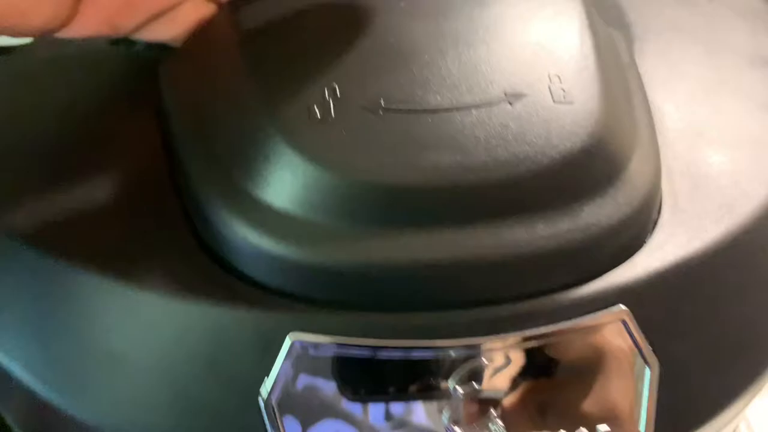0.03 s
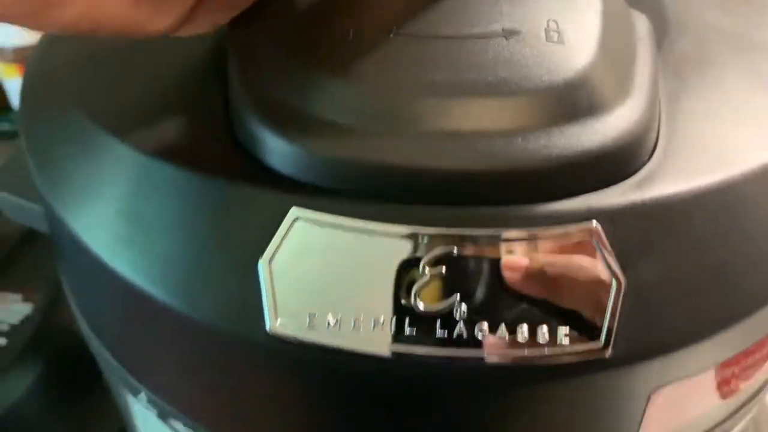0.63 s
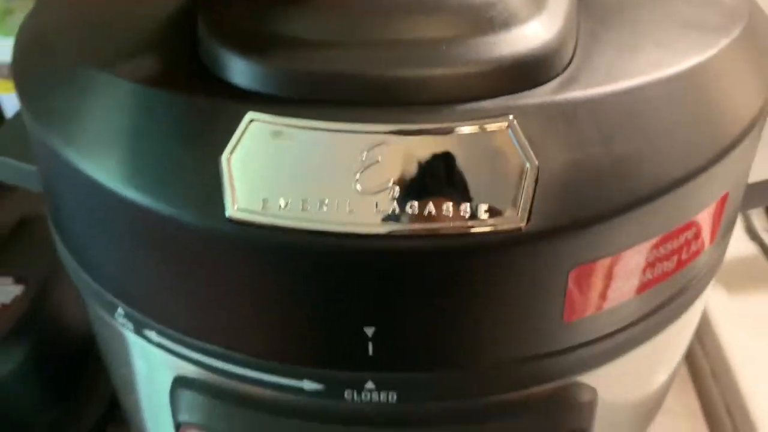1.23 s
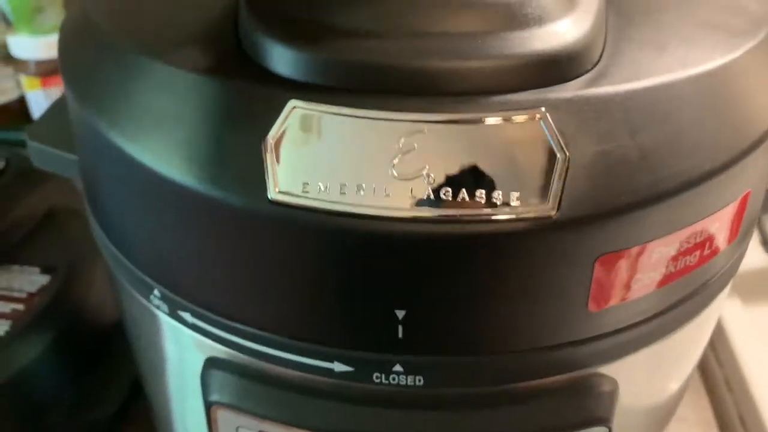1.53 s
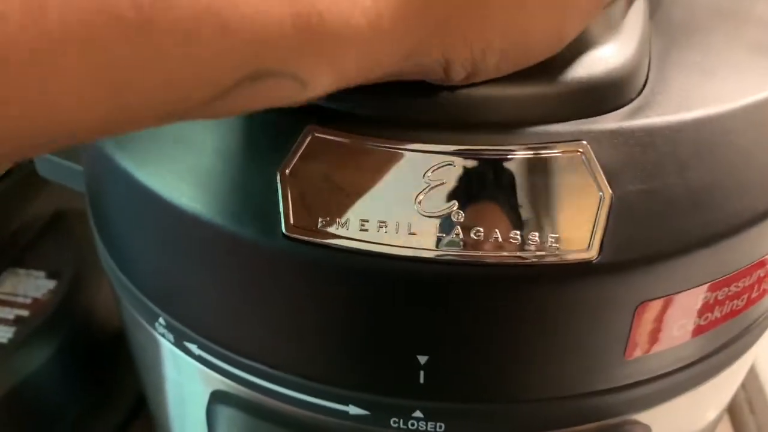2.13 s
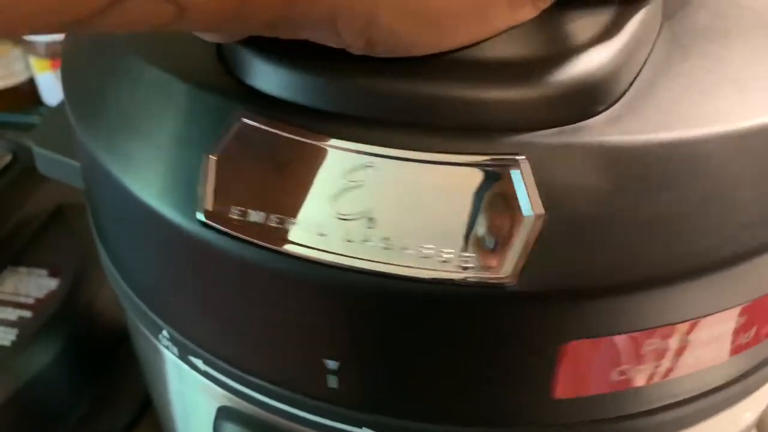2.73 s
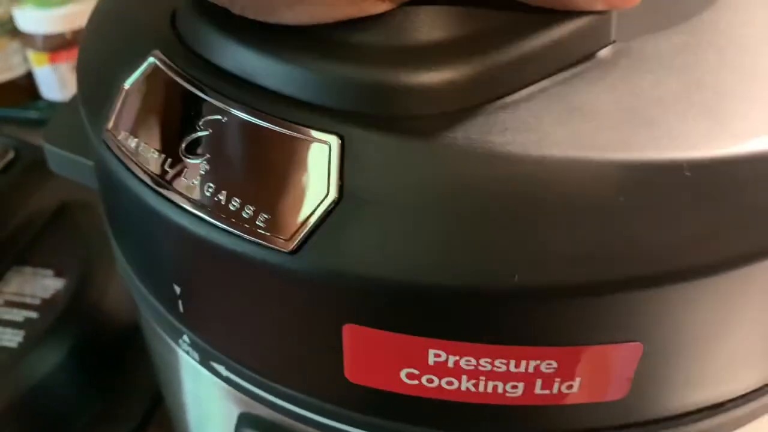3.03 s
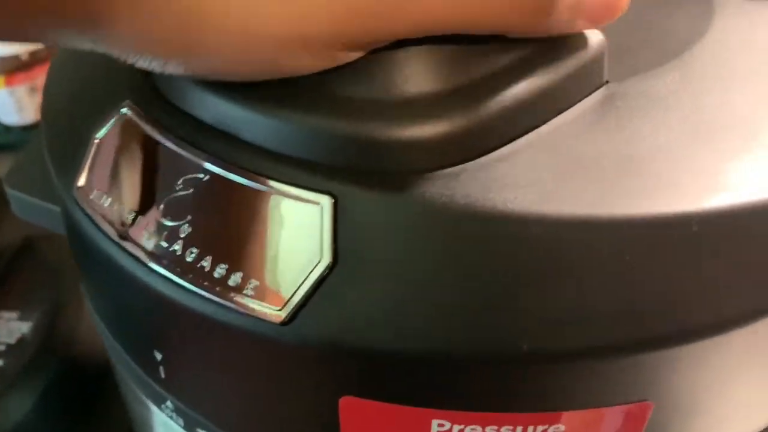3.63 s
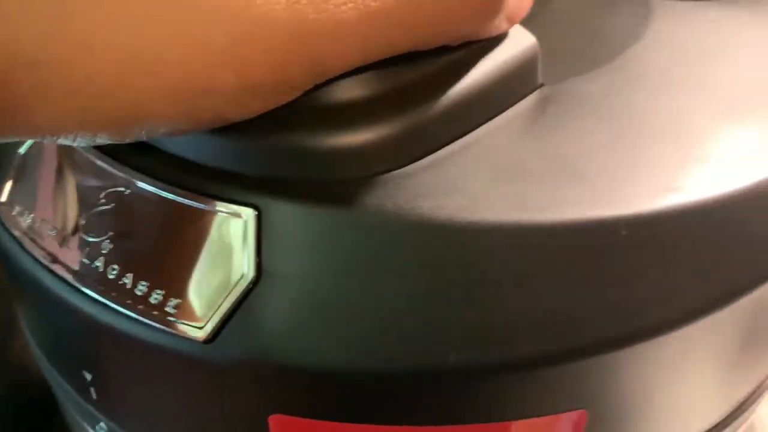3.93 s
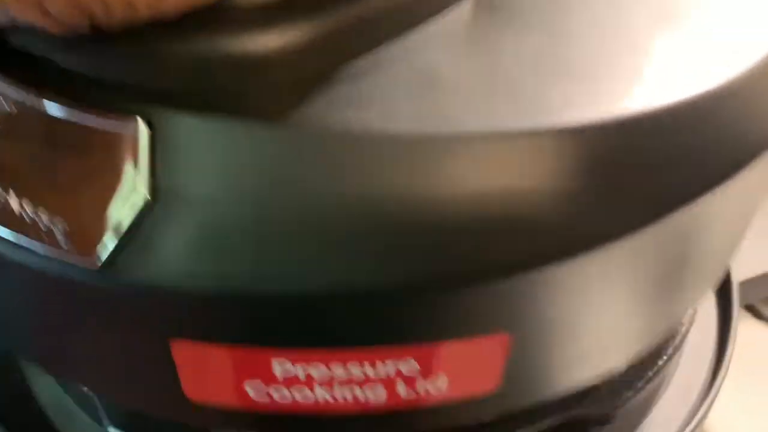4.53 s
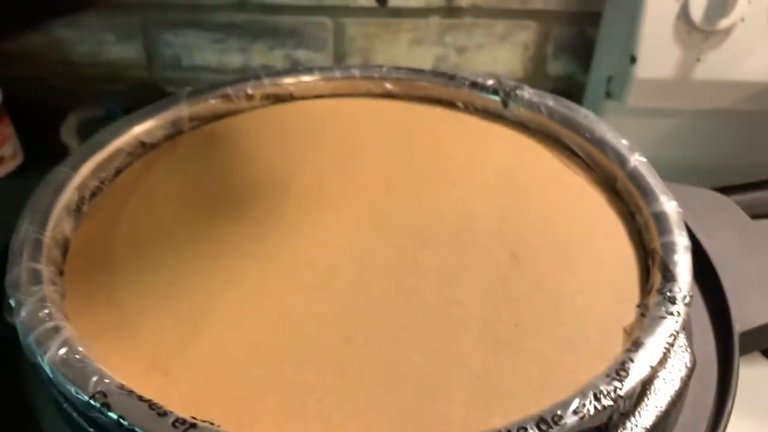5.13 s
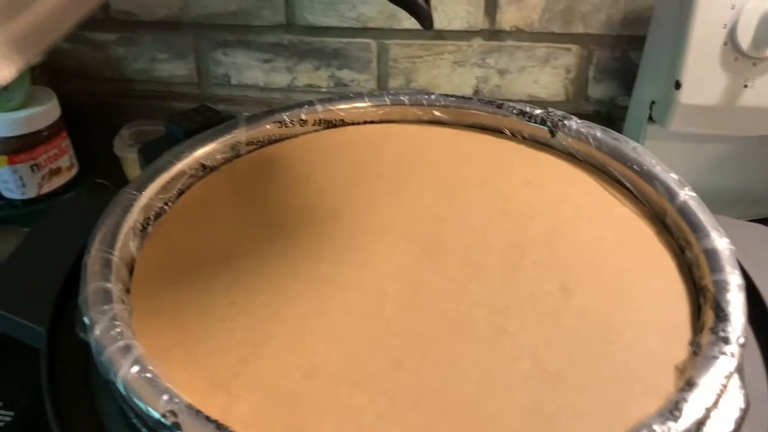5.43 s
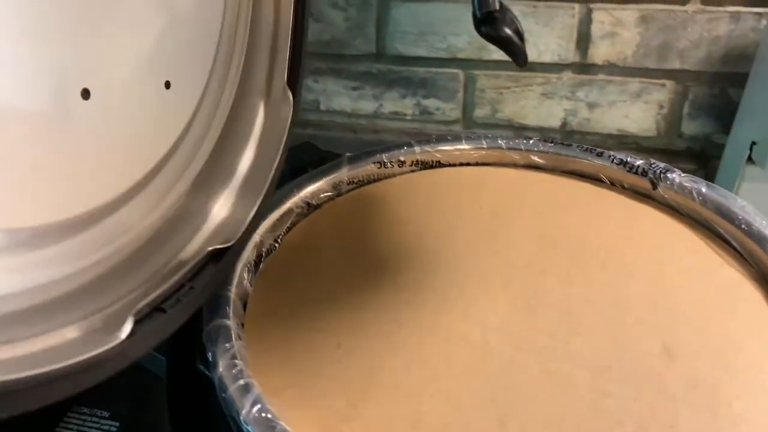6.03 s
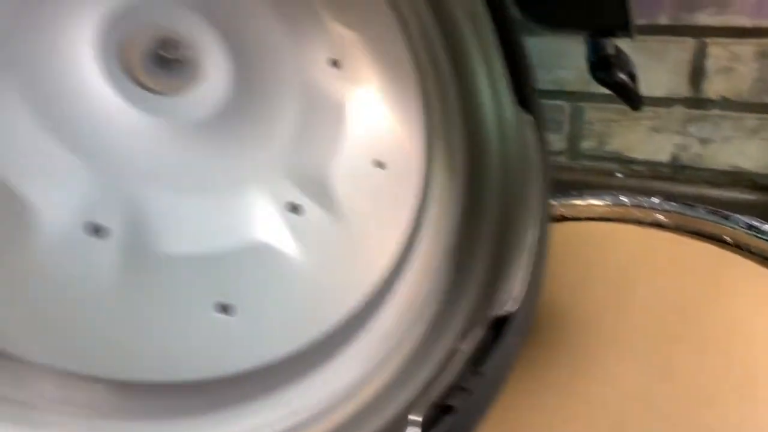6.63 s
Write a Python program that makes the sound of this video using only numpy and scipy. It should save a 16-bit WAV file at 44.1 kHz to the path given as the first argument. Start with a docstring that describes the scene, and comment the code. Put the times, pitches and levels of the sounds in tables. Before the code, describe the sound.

A distant motor, perhaps a washing machine, hums and churns faintly about once a second throughout, in a quiet kitchen. Close up, a hand rubs softly on the plastic lid of a pressure cooker, with a faint tap at about 1.7 seconds. From 2.3 seconds the lid is twisted: a few knocks, then a rough grinding with loud clunks and sharp clicks, ending against the stop at 3 seconds. After a lull with soft rubbing, the lid is pulled off between 4.2 and 4.5 seconds, with a strong clunk and short scrapes that briefly ring the steel rim. A thin, tiny snap follows at 4.8 seconds as the seal parts. As the lid tips up, its loose steel liner bumps lightly at about 5.3, 5.8 and 6 seconds, gives a brighter rattle near 6.2 seconds and one last soft bump at 6.5.

```python
"""In a quiet kitchen a far motor, perhaps a washing machine, hums and churns once a second throughout.
A hand rubs on the plastic lid of a pressure cooker and twists it: from 1.7 s impacts excite the lid's
modes, and from 2.3 s it grinds round its locking lugs by stick-slip friction and hits the stop.
At 4.2 s it is pulled off, scraping and ringing the steel rim; at 4.8 s the seal parts with a thin snap.
From 5.2 s, as the lid is tipped up, its loose steel liner bumps and rattles."""
import sys
import numpy as np
from scipy import signal
from scipy.fft import rfft, irfft
from scipy.io import wavfile

SR = 44100
rng = np.random.default_rng(int(sys.argv[2]) if len(sys.argv) > 2 else 0)


def file_out(sig):
    """Save sig as 16-bit WAV at sys.argv[1]."""
    # one column per channel
    cols = np.atleast_2d(sig).T
    # limit, then scale
    lim = np.clip(cols, -1, 1)
    pcm = np.round(lim * 32767).astype(np.int16)
    wavfile.write(sys.argv[1], SR, pcm)


N = 299880

# normal modes of the seated lid: (frequency [Hz], relative level [dB], T60 [s])
LID_MODES = [(76.4, -10.5, 0.57), (111.6, -3.5, 0.27), (165.5, -6, 0.34), (210, -4.5, 0.112),
             (250.6, 2.5, 0.12), (288.4, 0, 0.14), (329.2, 4, 0.094), (445, 2.5, 0.1), (555, -2, 0.086),
             (628, -3.5, 0.094), (711, 0, 0.056), (772, -3, 0.13), (900, 0, 0.052), (1017, -6.5, 0.066),
             (1132, -6, 0.089), (1229, -12.5, 0.1), (1341, -5, 0.071), (1520, -3.5, 0.048),
             (1720, -4.5, 0.088), (1984, -3, 0.11), (2318, -2.5, 0.1), (2815, -5, 0.096), (2960, -8, 0.13),
             (3150, -3, 0.05), (3540, -3, 0.063), (3980, -10.5, 0.098), (4410, -7.5, 0.13),
             (4580, -10, 0.043), (5000, -8, 0.084), (6410, -8.5, 0.053), (7300, -13, 0.096),
             (7930, -12, 0.049)]
# spectrum of the plastic's dense, short-lived modes: (frequency [Hz], relative level [dB])
PLASTIC_SPECTRUM = [(30, -15), (75, -26), (130, 6.5), (200, 8.5), (260, 3), (950, -0.5), (1280, -2),
                    (1900, 0), (3200, -1), (5000, -10), (7500, -9.5), (10000, -21), (13000, -18),
                    (16000, -36)]


def amp(db):
    """Amplitude ratio of a level in decibels."""
    return 10 ** (np.asarray(db) / 20)


def unit(x):
    """Normalisation to an rms of 1."""
    return x / np.sqrt(np.mean(x ** 2) + 1e-20)


def read(points, hz):
    """Interpolation of a table on a logarithmic frequency axis."""
    frequency, value = np.transpose(points)
    return np.interp(np.log(hz + 1), np.log(frequency + 1), value)


def bins(x):
    """Frequencies of a signal's Fourier components."""
    return np.fft.rfftfreq(x.shape[-1], 1 / SR)


def add(mix, start_s, sound):
    """Superposition of a stereo sound on the mix."""
    part = mix[:, round(start_s * SR):][:, :sound.shape[1]]
    part += sound[:, :part.shape[1]]


def colour(x, spectrum):
    """Zero-phase filtering by a table of (frequency [Hz], gain [dB])."""
    return irfft(rfft(x) * amp(read(spectrum, bins(x))), x.shape[-1])


def noise(density):
    """Stationary Gaussian noise of a given spectral density."""
    return colour(rng.standard_normal(N), density) * np.sqrt(SR / 2)


def waver(bandwidth_hz):
    """Slow random modulation: low-passed noise of rms 1."""
    white = rng.standard_normal(N)
    return unit(irfft(rfft(white) * np.exp(-(bins(white) / bandwidth_hz) ** 2), N))


def damp(x, t60s, decay_scale=1):
    """Frequency-dependent damping: each band decays exponentially at its own rate."""
    hz, t, spectra = signal.stft(x, SR, nperseg=128)
    t60 = np.maximum(decay_scale * read(t60s, hz)[:, None], 1e-3)
    return signal.istft(spectra * amp(-60 * t / t60), SR, nperseg=128)[1][:, :x.shape[1]]


def ears(pair):
    """Binaural cues: two independent signals gain interaural coherence, level and phase differences."""
    # likeness of the two ears: (frequency [Hz], coherence [0-1])
    coherence = [(60, 1), (300, 0.83), (640, 0.76), (1400, 0.28), (4000, 0.3), (8000, 0.6), (15000, 1)]
    # interaural level difference: (frequency [Hz], left minus right [dB])
    balance = [(60, 0.5), (250, -2.5), (600, -3.5), (1000, -3.5), (2000, -0.5), (5000, 3), (10000, -0.5)]
    # interaural phase difference: (frequency [Hz], lead of the left ear [rad])
    phase_lead = [(60, 0), (500, .2), (1120, .7), (2000, .6), (2600, 4.4), (3500, 5.8), (6500, 6.8),
                  (9400, 9.4), (12100, 12.3), (16000, 14)]
    left, independent = rfft(pair)
    hz = bins(pair)
    alike = np.clip(read(coherence, hz), 0, 1)
    tilt_db = read(balance, hz) / 2
    right = (alike * left + np.sqrt(1 - alike ** 2) * independent) * np.exp(-1j * read(phase_lead, hz))
    return irfft(np.array([left * amp(tilt_db), right * amp(-tilt_db)]), pair.shape[1])


def room_tone():
    """Steady room tone and hiss: in-phase and antiphase noise sum to a partly coherent field."""
    # noise floor: (frequency [Hz], in-phase density [dB re 1/Hz], antiphase density [dB re 1/Hz])
    floor = [(25, -98, -104), (56.7, -74, -87), (107, -85, -100), (352, -92.5, -99), (600, -102.5, -104),
             (980, -106, -104), (1330, -105, -102), (1910, -108, -105), (2860, -101, -101),
             (5500, -100.5, -99.5), (5950, -94, -100), (8340, -99.5, -99), (9420, -111, -91.5),
             (12430, -101.5, -110), (14800, -104.5, -111), (15800, -112, -115)]
    floor = np.array(floor)
    common, opposed = noise(floor[:, :2]), noise(floor[:, ::2])
    return np.array([common + opposed, common - opposed])


def motor(start_speed=.8, spin_up_s=.06, slowing_per_s=.7, swell_s=0.16, swell_db=8.5):
    """Rotating machinery: the rotor's hum follows its speed as each stroke spins up, churns and coasts."""
    # strokes: (start [s], powered time [s], delay of the hum's peak [s], hum gain at the peak [dB])
    strokes = [(-.17, 0.75, 0.36, 2.5), (.836, 0.75, 0.59, -1), (1.842, 0.85, 0.38, 1.5),
               (2.83, 0.73, 0.52, -1.5), (3.816, .76, 0.42, 4.5), (4.845, 0.72, 0.65, -3),
               (5.86, 0.7, 0.3, 1.5)]
    # mains hum: (frequency [Hz], base level [dB])
    mains_tones = [(60, -61.5), (119, -57.5), (240, -64.5)]
    # rotor hum at full speed: (frequency [Hz], base level [dB])
    rotor_tones = [(160, -52.5), (319, -60.5), (482, -67.5), (755, -78.5), (802, -67.5), (960, -85.5),
                   (1122, -79)]
    # churning noise: (frequency [Hz], base density [dB re 1/Hz])
    churn_spectrum = [(25, -102), (55, -78), (130, -73.5), (195, -90.5), (250, -84), (325, -74.5),
                      (420, -85.5), (600, -90.5), (800, -95), (1100, -100), (2000, -108), (4000, -120)]
    t = np.arange(N) / SR
    strokes = np.array(strokes)
    current = np.maximum(np.searchsorted(strokes[:, 0], t) - 1, 0)
    start, powered, peak_at, peak_db = strokes[current].T
    age = t - start
    coasting = np.maximum(age - powered, 0)
    speed = 1 - (1 - start_speed) * np.exp(-age / spin_up_s) - slowing_per_s * coasting  # 1 is full
    drive = np.clip(age / .005, 0, 1) * amp(-114 * coasting)  # on in 5 ms, coasts down at 114 dB/s
    rotor_time = np.cumsum(speed * (1 + 0.00692 * waver(10.5))) / SR
    left_lead_rad = np.array([[1.0], [0]])
    swell = amp(peak_db + swell_db * (np.exp(-((age - peak_at) / swell_s) ** 2) - 1))
    mains = sum(amp(db + 2.5 * waver(5)) * np.sin(2 * np.pi * hz * t) for hz, db in mains_tones)
    rotor = sum(amp(db + 2.5 * waver(5)) * np.sin(2 * np.pi * hz * rotor_time + left_lead_rad)
                for hz, db in rotor_tones)
    hum = np.sqrt(2) * (mains + swell * rotor) * drive * amp(80 * (speed - 1))  # grows with speed
    # the room makes the churning wide, except in the bass
    wide = colour(noise(churn_spectrum), [(100, -11.5), (330, -7.5), (650, 3.0)])
    churn = (noise(churn_spectrum) + np.array([wide, -wide])) * amp(1.5 * waver(16))
    return hum + churn * np.maximum(drive, amp(-27))  # a residue stays between strokes


def kitchen(x, build_up_s=0.012):
    """Reverberation: reflections from counter, wall and cupboards merge into a short diffuse tail."""
    # reverberation time: (frequency [Hz], T60 [s])
    room_t60 = [(100, 0.63), (500, 0.12), (2000, 0.31), (8000, 0.27), (15000, 0.15)]
    t = np.arange(SR // 2) / SR
    tail = damp(rng.standard_normal((2, len(t))), room_t60)
    tail *= 1 - np.exp(-(t / build_up_s) ** 2)
    return signal.oaconvolve(x, tail / np.linalg.norm(tail[0]), axes=1)[:, :N]


def slips(shape, per_s, uneven_db):
    """Stick-slip friction as a Poisson train of impulses of random sign and size."""
    impulses = (rng.random(shape) < per_s / SR) * rng.choice([-1, 1], shape)
    return impulses * amp(uneven_db * np.minimum(rng.exponential(1, shape), 3))


def hand_rub(shifting_db=3.0):
    """Friction of skin on plastic: tiny slips in four bands, each swelling and sinking on its own."""
    # strength of the rubbing as the grip shifts: (time [s], level [dB])
    rubbing = [(0, -62.5), (.3, -62), (.7, -74), (1.1, -74), (1.45, -78), (1.66, -61.5), (1.85, -69.5),
               (2.2, -59.5), (2.6, -63), (3.2, -97), (3.55, -61), (3.9, -66), (4.2, -56.5), (4.6, -83),
               (5.0, -63.5), (5.25, -61.5), (5.6, -68.5), (6.1, -60.5), (6.35, -65.5), (6.5, -64),
               (6.8, -68.5)]
    # spectrum of the rubbing: (frequency [Hz], relative level [dB])
    skin_spectrum = [(30, -20), (500, 6), (1000, -1.5), (2000, -4.5), (3000, -3.5), (4700, -1), (6500, -16),
                     (9000, -36), (16000, -19)]
    out, edges_hz = np.zeros((2, N)), np.geomspace(600, 12000, 5)
    for band in zip(edges_hz, edges_hz[1:]):
        bandpass = signal.butter(2, band, "band", fs=SR, output="sos")
        grains = signal.sosfilt(bandpass, slips((2, N), per_s=2500, uneven_db=3.5))
        out += grains * amp(shifting_db * waver(7.5))
    envelope = amp(np.interp(np.arange(N) / SR, *np.transpose(rubbing)))
    return unit(ears(colour(out, skin_spectrum))) * envelope


def seal_snap(start_s=4.7922, decay_s=.0004):
    """A heavily damped transient: the seal parts with a few cycles of high treble."""
    # partials of the snap: (frequency [Hz], initial level [dB])
    partials = [(7800, -44), (10300, -49), (12800, -29), (15000, -42)]
    t, out = np.arange(SR // 100) / SR, np.zeros((2, N))
    tones = sum(amp(db) * np.sin(2 * np.pi * hz * t) for hz, db in partials)
    add(out, start_s, np.tile(tones * np.exp(-t / decay_s), (2, 1)))
    return out


def rim_ring():
    """Free vibration of the pot's steel rim: an impulse response of unit energy."""
    # normal modes of the rim: (frequency [Hz], relative level [dB], T60 [s])
    rim_modes = [(1994, -1, 0.15), (3260, -5, .2), (3260, -6, 0.09), (4237, -4, 0.13), (5950, -11, .16),
                 (7200, -3, .065), (12190, -7, 0.097)]
    t = np.arange(SR // 3) / SR
    hz, db, t60 = np.transpose(rim_modes)[:, :, None]
    signs = rng.choice([-1, 1], (2, len(rim_modes), 1))
    pair = ears((signs * amp(db - 60 * t / t60) * np.sin(2 * np.pi * hz * t)).sum(1))
    return pair / np.sqrt(np.sum(pair ** 2) / 2)


def tab_scrapes(catches_per_s=1100, catch_s=0.00037, release_s=.005, rim_db=-5):
    """Intermittent contact: a locking tab catches and skips in tiny clicks that excite the rim."""
    # scrapes of the tabs over the rim: (start [s], duration [s], level [dB])
    scrapes = [(2.643, .017, -42), (2.662, .035, -54), (2.873, 0.011, -34), (2.879, 0.04, -45),
               (2.955, .012, -47), (4.355, .02, -47.5), (4.404, 0.007, -43), (4.417, 0.019, -48)]
    # spectrum of the scraping: (frequency [Hz], relative level [dB])
    grit_spectrum = [(30, -40), (2000, -20), (4500, -3), (7500, 7), (9500, -11), (12000, -3), (16000, -14)]
    out, t = np.zeros((2, N)), np.arange(SR // 8) / SR
    for start, duration, db in scrapes:
        catches = (rng.random(len(t)) < catches_per_s / SR) * rng.uniform(.5, 1, len(t))
        force = signal.lfilter([1], [1, -np.exp(-1 / (SR * catch_s))], catches)
        force *= np.exp(-np.maximum(t - duration, 0) / release_s)
        grit = ears(colour(force * rng.standard_normal((2, len(t))), grit_spectrum))
        steel = signal.fftconvolve(force[None] * rng.standard_normal(len(t)), rim_ring(), axes=1)
        for part, part_db in [(grit, db), (steel, db + rim_db)]:
            rms = np.sqrt((np.sum(part ** 2) + 1e-20) / (2 * duration * SR))
            add(out, start, amp(part_db) * part / rms)
    return out


def body_ring(modes, dense_spectrum, decay_scale, dense_db, spot_hz=None):
    """Modal impulse response: distinct damped sinusoids over dense modes that overlap into noise."""
    # decay of the dense modes: (frequency [Hz], T60 [s])
    dense_t60 = [(100, 0.19), (400, 0.14), (1500, 0.069), (5000, 0.11), (14000, 0.055)]
    t = np.arange(SR // 4) / SR
    hz, db, t60 = np.transpose(modes)[:, :, None]
    scatter_db, detune, polarity = rng.standard_normal((3, 2, len(modes), 1))
    if spot_hz:  # the struck spot favours the modes near its own frequency
        db = db + 6 * np.exp(-(np.log(hz / spot_hz) / 0.14) ** 2)
    decay = amp(db + scatter_db - 60 * t / (t60 * decay_scale))
    alternating = (-1) ** np.arange(len(modes))[:, None]  # neighbours swing opposite ways
    signs = np.array([alternating, np.sign(polarity[1])])
    distinct = (signs * decay * np.sin(2 * np.pi * hz * (1 + 0.0064 * detune) * t)).sum(1)
    dense = ears(colour(rng.standard_normal((2, len(t))), dense_spectrum))
    dense = damp(dense, dense_t60, decay_scale)
    taper = np.minimum(1, (t[-1] - t) / t[-1] * 2)
    return (unit(ears(distinct)) + amp(dense_db) * unit(dense)) * taper


def push(start, duration, fall_db_per_s, grip_s=0.012):
    """Force envelope of one push: a linear rise, a hold and an exponential release."""
    age = np.arange(N) / SR - start
    return np.clip(age / grip_s, 0, 1) * amp(-np.clip(fall_db_per_s * (age - duration), 0, 120))


def lug_grind(lug_detune=0.021, split_hz=1500):
    """Forced vibration: stick-slip at three lugs sharing a shifting load, each at its own pitch."""
    # pushes of the hand: (start [s], duration [s], low grind level [dB], high rasp level [dB])
    pushes = [(2.321, 0.074, -47, -56), (2.508, 0.22, -51, -58), (2.621, 0.038, -36.5, -38.5),
              (2.656, 0.24, -34, -48), (2.858, 0.04, -29, -31.5), (2.919, 0.062, -33.5, -46),
              (4.245, 0.076, -52.5, -52), (4.343, 0.048, -47, -46), (4.47, 0.064, -61.5, -78)]
    out = np.zeros((2, N))
    grind = np.max([amp(db) * push(start, duration, 272) for start, duration, db, _ in pushes], axis=0)
    rasp = np.max([amp(db) * push(start, duration, 348) for start, duration, _, db in pushes], axis=0)
    pressure = amp(-0.85 * waver(25))  # the hand never pushes evenly
    loads = amp([3 * waver(18) for _ in range(3)])
    loads /= np.linalg.norm(loads, axis=0)
    # spectrum of the sliding force: (frequency [Hz], gain [dB])
    force_spectrum = [(60, -19), (130, -3), (240, 0), (330, -2.5), (480, 0), (800, -0.5), (1100, 5),
                      (1400, 0.5), (4000, -0.5), (7000, 0), (16000, -8)]
    for load, pitch in zip(loads, [1 - lug_detune, 1, 1 + lug_detune]):
        modes = np.array(LID_MODES) * [pitch, 1, 1]
        for envelope, band in [(grind, "low"), (rasp, "high")]:
            friction = unit(slips(N, per_s=520, uneven_db=2.0))
            force = colour(friction * envelope * pressure * load, force_spectrum)
            ring = body_ring(modes, PLASTIC_SPECTRUM, decay_scale=0.91, dense_db=-3)
            response = signal.sosfilt(signal.butter(2, split_hz, band, fs=SR, output="sos"), ring)
            response = unit(response) / np.sqrt(response.shape[1])
            out += signal.oaconvolve(force[None], response, axes=1)[:, :N]
    return out


def thud(spot_hz, t, decay_cycles=1.14):
    """Local elastic deformation: the struck spot gives way and springs back within a cycle or two."""
    cycles = spot_hz * t
    return np.sin(2 * np.pi * cycles) * np.exp(-cycles / decay_cycles)


def crack(decay_s=0.0038, rim_db=-7):
    """Contact transient: two hard edges meet in a bright burst that sets the rim ringing."""
    # spectrum of the burst: (frequency [Hz], relative level [dB])
    burst_spectrum = [(30, -43.5), (1000, -20), (4500, 5), (8500, 8), (10000, -5), (13000, 3), (16000, -10)]
    t = np.arange(SR // 3) / SR
    burst = unit(ears(colour(rng.standard_normal((2, len(t))), burst_spectrum))) * np.exp(-t / decay_s)
    return burst + amp(rim_db) * np.linalg.norm(burst[0]) * rim_ring()


def contact(tap, weight, hardness, spot_hz, edge_hz, edge_db, pivot_hz=745, full_weight_hz=132.5):
    """Contact as a minimum-phase filter: weight lifts bass, hardness treble, spot and edge a band each."""
    size = 2 ** 14
    hz = abs(np.fft.fftfreq(size, 1 / SR)) + 1
    octaves = np.log2(np.maximum(hz, full_weight_hz) / pivot_hz)
    tilt_db = weight * np.maximum(-octaves, 0) + hardness * np.maximum(octaves, 0)
    spot_lift_db = 4 * np.exp(-(np.log2(hz / spot_hz) / 0.59) ** 2)
    edge_lift_db = edge_db * np.exp(-(np.log2(hz / edge_hz) / 0.54) ** 2)
    low_cut = 1 / (1 + (62.5 / hz) ** 4)  # deep bass below about 60 Hz is cut away
    gain = amp(tilt_db + spot_lift_db + edge_lift_db) * low_cut
    causal = np.exp(np.conj(signal.hilbert(np.log(np.maximum(gain, 1e-3)))))
    return irfft(rfft(tap, size) * causal[:size // 2 + 1], size)[:, :tap.shape[1]]


def impacts(blows, modes, dense_spectrum, dense_db, rise_s, thud_db):
    """Impulsive excitation: each blow rings and thuds one body, shaped by the contact, and cracks."""
    out = np.zeros((2, N))
    onset = SR // 50  # the first 20 ms hold nearly all of a blow and set its level
    for start, db, weight, hardness, decay_scale, spot_hz, edge_hz, edge_db, crack_db in blows:
        tap = body_ring(modes, dense_spectrum, decay_scale, dense_db, spot_hz)
        t = np.arange(tap.shape[1]) / SR
        tap += amp(thud_db) * np.std(tap[:, :onset]) * thud(spot_hz, t)
        tap *= 1 - np.exp(-t / (rise_s * decay_scale))
        tap = contact(tap, weight, hardness, spot_hz, edge_hz, edge_db)
        add(out, start, amp(db) * tap / np.sqrt(np.mean(tap[:, :onset] ** 2)))
        add(out, start, amp(crack_db) * crack())
    return out


def liner_bumps():
    """Rattle of a loose part: the steel liner rocks into contact gently, so its ring builds more slowly."""
    # bumps: (time [s], level [dB], weight [dB/octave of bass], hardness [dB/octave of treble],
    # decay scale [ratio], spot frequency [Hz], edge frequency [Hz], edge lift [dB], crack level [dB])
    bumps = [(5.208, -57.5, -4, -2, 1, 1696, 2600, 8, -70),
             (5.268, -36.5, -4.5, -12, 0.49, 570, 950, -4.5, -66),
             (5.281, -34.5, -3, -12.5, 1.1, 325, 315, 4, -68),
             (5.750, -49, -10, -5, 1.2, 490, 2200, 0, -70),
             (5.777, -43.5, 3, -4.5, 1.48, 493, 2000, 10.5, -70),
             (6.001, -34.5, 6.5, -4, 1.2, 304, 700, 3.5, -66),
             (6.175, -47.5, -5, -4, 3.1, 2144, 2400, 5, -70),
             (6.2098, -37, -5, 2.2, 1.26, 1720, 1240, 6, -53),
             (6.2285, -31.5, -2, 1.2, 0.85, 970, 2300, 1.5, -50),
             (6.248, -41.5, -25, 2, 0.78, 4470, 1300, 8, -46),
             (6.516, -46, 10.5, -2, 0.23, 288, 3400, -7, -70)]
    # normal modes of the liner: (frequency [Hz], relative level [dB], T60 [s])
    liner_modes = [(276, 2.5, 0.081), (334, 4.5, 0.1), (486, 9, 0.07), (648, 2.5, 0.066), (813, -16, 0.036),
                   (976, -1.5, 0.13), (1687, -4, 0.13), (2115, -2.5, 0.09), (2246, -2.5, 0.12),
                   (2390, 1.5, 0.1), (2650, -0.5, 0.09), (3270, -4, 0.13), (3400, -10, 0.21),
                   (3650, -12, 0.12), (4090, -12, 0.16), (4538, -19, 0.17), (5100, -5, 0.12),
                   (5740, -16, 0.11), (7640, 3, 0.092), (8829, -2, 0.066), (10960, 7, 0.065),
                   (12200, -9, 0.077), (13130, -10, 0.08)]
    # spectrum of the thin steel's dense, short-lived modes: (frequency [Hz], relative level [dB])
    steel_spectrum = [(30, -11), (150, -2), (500, -2.5), (1300, -6), (4000, -7), (7500, -3), (10000, -10),
                      (12200, 5.5), (13500, -8), (15000, -6), (16000, -11)]
    return impacts(bumps, liner_modes, steel_spectrum, dense_db=-0.5, rise_s=0.0014, thud_db=-5)


def lid_knocks():
    """Hard impact: the plastic lid strikes the pot and its modes are excited almost at once."""
    # knocks: (time [s], level [dB], weight [dB/octave of bass], hardness [dB/octave of treble],
    # decay scale [ratio], spot frequency [Hz], edge frequency [Hz], edge lift [dB], crack level [dB])
    knocks = [(1.656, -53, -7, -3, 1.05, 1135, 2000, 1, -68), (2.286, -43, 3, -2, 2, 885, 1410, 7, -50),
              (2.358, -31.5, 2.5, -1, 1.66, 397, 3423, 3, -58),
              (2.382, -35, 4, 1.5, 1, 219, 1120, 15.5, -54),
              (2.6378, -20.5, -2.5, 0, 0.51, 583, 910, 9.5, -37),
              (2.6445, -27.5, -7, -0.5, 0.87, 320, 1990, 3.5, -47),
              (2.653, -36, -6, -2, 0.49, 304, 564, 11, -35),
              (2.659, -39.5, 1, 1, 0.36, 620, 10000, 24, -35),
              (2.694, -34.5, -6, -1.5, 0.96, 320, 800, 5, -70),
              (2.820, -30.5, 2, -7, 1.2, 317, 420, 2, -65), (2.857, -31, -3, 0, 0.49, 170, 560, 4, -44),
              (2.8705, -26, -12, 3, 0.79, 6700, 3300, 0.5, -26),
              (2.8965, -22.5, 3, 0, 0.87, 181, 574, 3, -43),
              (2.9755, -24.5, 4, -2, 0.67, 114, 1160, 11, -40),
              (2.9775, -22.5, 0.5, -7, 0.32, 490, 1200, 10.5, -44),
              (3.039, -48, 9, 4.5, 0.54, 4400, 1400, 9, -63),
              (4.192, -41.5, 2, -2, 1.7, 3540, 2330, 0, -68),
              (4.245, -31.5, 3.5, 2, 0.93, 153, 1530, 10.5, -34),
              (4.3375, -34.5, 5.5, -2, 1.4, 500, 1110, 5.5, -46),
              (4.381, -19.5, 2.5, -4.5, 0.5, 278.5, 400, 0.5, -35.5),
              (4.3838, -28, -3.5, -5.5, 0.67, 706, 378, 6, -50),
              (4.408, -41.5, 2, 6.5, 0.93, 7400, 10000, 9, -48),
              (4.422, -45, 0, 3.5, 1.2, 2550, 7000, -1, -52),
              (4.431, -34.5, 13.5, 5, 0.3, 8000, 10000, 11, -47)]
    return impacts(knocks, LID_MODES, PLASTIC_SPECTRUM, dense_db=-4.0, rise_s=0.0001, thud_db=2.5)


def scene(room_db=-18):
    """Superposition of the near lid's direct sound, its reverberation and the background."""
    lid = lid_knocks() + liner_bumps() + lug_grind() + tab_scrapes() + seal_snap() + hand_rub()
    return lid + amp(room_db) * kitchen(lid) + motor() + room_tone()


def record(dry, cutoff_hz=15800):
    """Band limiting by a linear-phase low-pass filter."""
    lowpass = signal.firwin(511, cutoff_hz, window=("kaiser", 9), fs=SR)
    return signal.oaconvolve(dry, lowpass[None], "same", axes=1)


dry = scene()
out = record(dry)
file_out(out)
```